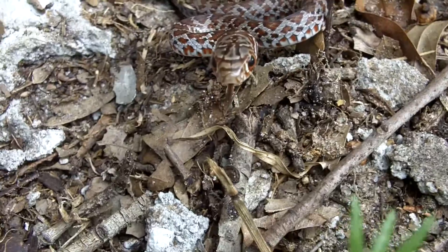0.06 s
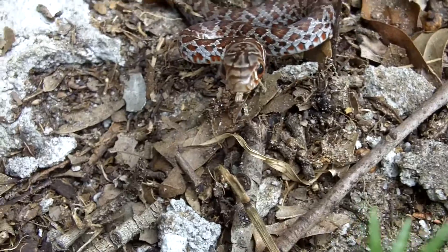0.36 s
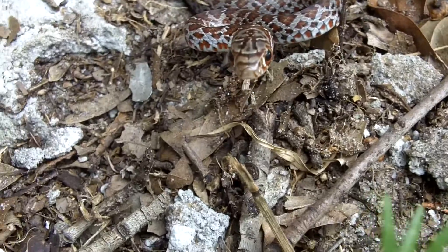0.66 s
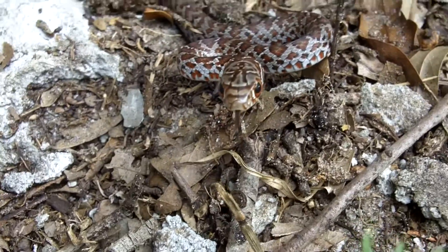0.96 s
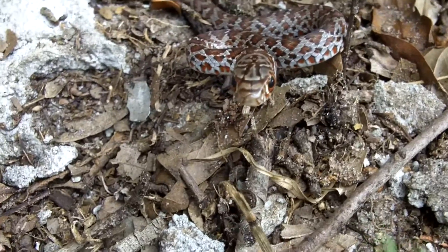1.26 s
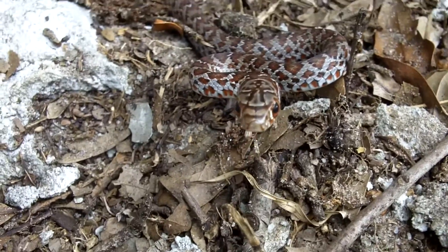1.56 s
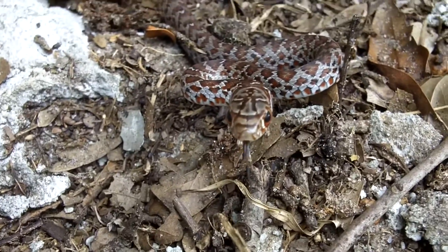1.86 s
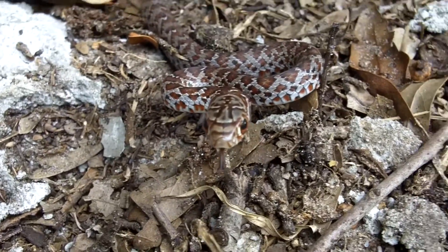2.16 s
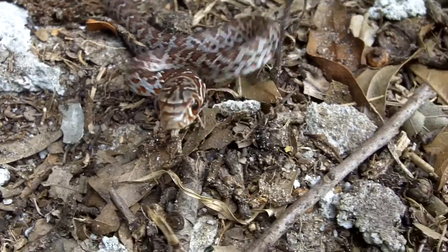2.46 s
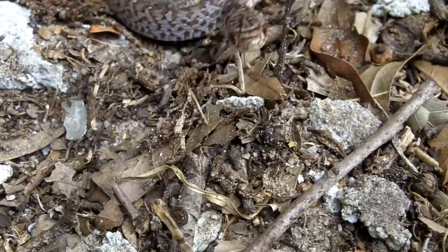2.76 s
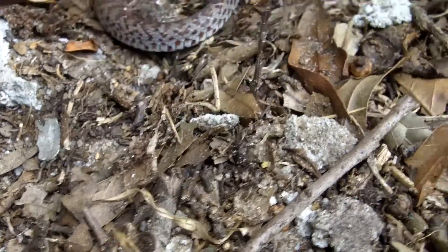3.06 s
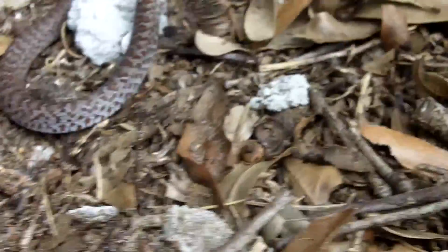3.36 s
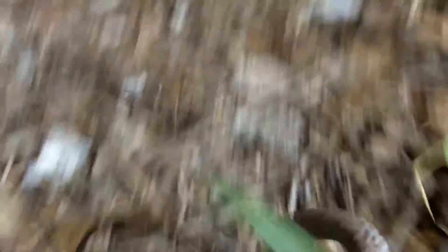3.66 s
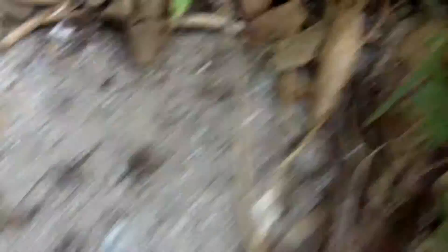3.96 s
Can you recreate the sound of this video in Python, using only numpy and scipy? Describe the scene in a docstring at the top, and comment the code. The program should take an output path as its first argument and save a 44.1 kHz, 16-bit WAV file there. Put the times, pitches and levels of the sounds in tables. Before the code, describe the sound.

Short snake hisses amid faint insects and low rumble, followed by rustling and microphone bumps.

```python
"""Air rumbles on a hand-held microphone, insects buzz in short waves and something calls faintly.
Far traffic swells and fades around 1.5 s. After 3 s a small snake, coiled in dry leaves, forces out
two short hisses of breath, the louder one as it strikes, then slithers with two soft rustles.
The microphone is jerked away: leaves and grass brush past it, the hand knocks its housing and the
rush of air thumps on its opening. The snake hisses once more at the very end."""
import sys
import numpy as np
from scipy import signal
from scipy.fft import rfft, irfft
from scipy.io import wavfile
from scipy.ndimage import map_coordinates

SR = 44100
rng = np.random.default_rng(int(sys.argv[2]) if len(sys.argv) > 2 else 0)


def persist_wave(psi):
    """Save psi, clipped to +-1, as 16-bit WAV."""
    counts = np.round(np.clip(psi, -1, 1) * 32767).astype(np.int16)
    wavfile.write(sys.argv[1], SR, np.atleast_2d(counts).T)


N = 176400
T = np.arange(N) / SR

# A "colour" says how strong the low and high parts of a sound are, compared with each other.
# colour of moving air and distant traffic: pitch_hz, strength_db
RUMBLE_COLOUR = [(15, 1), (34, -0.5), (44, -4), (60, -5), (76, -9.5), (100, -13.5), (120, -8.5),
                 (143, -20.5), (175, -13), (210, -28), (242, -18.5), (280, -29), (320, -25.5), (420, -33.5),
                 (650, -40), (1300, -47.5), (2400, -55), (3800, -64), (6000, -102)]
# loudness of that rumble: time_s, level_db
RUMBLE_LEVEL = [(0, -29.5), (.4, -32.5), (.8, -31.5), (1.1, -31), (1.6, -32), (2.5, -31), (3.2, -32.5),
                (3.7, -32), (4.0, -33)]
# colour of a far vehicle's roar: pitch_hz, strength_db
ROAR_COLOUR = [(120, -19), (200, -10.5), (240, 12), (285, 3.5), (320, -3.5), (420, -2), (650, -14),
               (880, -7), (1200, -32), (3000, -72)]
# hum of its engine: pitch_hz, level_db
ENGINE_TONES = [(177.6, -53.5), (258.4, -52.5)]
# colour of the steady high hiss: pitch_hz, strength_db
HISS_COLOUR = [(3000, -37), (4000, -10.5), (4700, 3.5), (5400, 7), (6200, -3.5), (7400, -13.5), (8200, 1),
               (9100, 7.5), (10000, 3.5), (11000, -7.5), (12500, -9.5), (15000, -20.5)]
# small distant ticks and chirps: centre_s, length_s, pitch_hz, width_hz, level_db
TICKS = [(.8, 0.17, 1478, 330, -66.5), (0.847, 0.011, 3170, 110, -68.5), (2.45, .09, 3165, 110, -76),
         (3.35, 0.007, 2900, 548.6, -61.5)]
# waves of high buzz (insects, then two soft slithering rustles after the strike):
# centre_s, length_s, level_db, pitch_ratio
BUZZ_WAVES = [(0, 0.058, -52.5, 0.98), (0.383, .11, -57, 1.015), (0.586, 0.12, -56.5, 0.98),
              (0.786, 0.069, -56.5, 1.01), (1.197, 0.12, -53, .995), (1.59, 0.12, -60, 1),
              (1.852, 0.12, -57, 1), (2.054, 0.09, -58.5, 1), (2.495, 0.14, -55, 1.02),
              (2.84, 0.2, -59.5, 1.0), (3.06, 0.095, -55, 1.0), (3.145, .07, -57, .97),
              (3.52, 0.071, -56.5, 1.01), (3.62, 0.065, -57.5, 0.96)]
# colour of the buzz: pitch_hz, strength_db
BUZZ_COLOUR = [(4000, -30), (4950, -14), (5250, -1), (5550, 0), (5850, -10), (6400, -18), (8000, -22),
               (9300, -13), (10000, -7), (10700, -6), (11300, -15), (12500, -24), (15000, -32)]
# sharp rings within the buzz: pitch_hz, width_hz, level_against_buzz_db
BUZZ_RINGS = [(5450, 130, -8), (10450, 170, -9)]
# sliding through the grass: time_s, swish_db, crunch_db
GRASS_SLIDE = [(3.0, -65, -97), (3.58, -63, -78), (3.67, -53.5, -65), (3.72, -47, -65), (3.81, -51, -59),
               (3.85, -46.5, -51.5), (3.9, -49, -60), (3.96, -52, -63), (4.0, -73, -59)]
# single leaves brushing by: peak_s, rise_s, fall_s, swish_db, swish_pitch_ratio, crunch_db
LEAF_BRUSHES = [(3.674, .0015, .002, -52, .9, -54), (3.685, .001, .003, -45, 1.4, -60),
                (3.691, .002, .0035, -36.5, 1.02, -48.5), (3.717, .0008, .001, -46, 1.45, -66),
                (3.728, .005, .003, -41, .98, -58), (3.736, .001, .002, -48, .95, -56),
                (3.758, .006, .005, -41.5, 1.0, -58), (3.782, .0015, .002, -50, .9, -43.5),
                (3.7875, .0007, .0012, -40.5, 1.0, -54), (3.792, .002, .003, -45, 1.0, -46.5),
                (3.825, .002, .003, -47, .92, -47), (3.836, .003, .003, -45, 1.1, -52),
                (3.849, .004, .003, -40, .9, -47), (3.864, .003, .003, -35.5, .9, -42),
                (3.889, .001, .002, -45, .85, -53), (3.903, .003, .007, -45, .86, -54),
                (3.9265, .0007, .001, -41, 1.05, -64)]
# colour of the bright swish of leaves and grass: pitch_hz, strength_db
SWISH_COLOUR = [(3000, -25), (4600, -9.5), (5700, 2), (6800, 5.5), (7800, 0.5), (9500, -1), (11000, -3.5),
                (13000, -17.5), (15000, -10)]
# colour of their duller crunch: pitch_hz, strength_db
CRUNCH_COLOUR = [(200, -24), (450, -14), (800, -14), (1300, -5.5), (1900, -5), (2800, -4), (3500, -10),
                 (5000, -30)]
# the hand scuffing the housing: time_s, level_db
SCUFF_LEVEL = [(3.76, -79), (3.8, -51), (3.845, -47), (3.865, -42), (3.885, -48), (3.93, -79)]
# colour of the scuff: pitch_hz, strength_db
SCUFF_COLOUR = [(150, -12), (400, 2), (750, -2.5), (1200, -7), (2200, -28)]
# dull knocks of the hand on the housing: start_s, pitch_hz, decay_s, level_db
KNOCKS = [(3.84, 64, .04, -15.5), (3.86, 170, .014, -22), (3.92, 88, .016, -18), (3.927, 255, .007, -28)]
# shoves of air on the microphone: peak_s, rise_s, fall_s, signed_pressure (1 is full scale)
AIR_SHOVES = [(3.82, .025, .02, .4), (3.862, .009, .019, -.88), (3.902, .007, .012, .38),
              (3.93, .002, .002, .1), (3.966, .005, .012, .14)]
# swirling air stirred up by the jerk: time_s, level_db
GUST_LEVEL = [(3.55, -56), (3.77, -42), (3.83, -32), (3.863, -25), (3.89, -29), (3.93, -28), (3.945, -34),
              (4.0, -37)]
# colour of that gust: pitch_hz, strength_db
GUST_COLOUR = [(20, 6.5), (60, -2), (110, 3), (220, -11.5), (330, -19), (500, -41), (900, -48), (3000, -58)]
# colour of a faint noise that spreads the sound left and right: pitch_hz, strength_db
SPREAD_COLOUR = [(20, 19), (100, -10), (300, -54), (1000, -34), (3000, -35), (6000, -106), (12000, -32),
                 (15000, -32)]
# the snake's hisses: peak_s, rise_s, fall_s, level_db, pitch_ratio
SNAKE_HISSES = [(3.252, .012, .02, -51.5, .92), (3.472, .038, .024, -43.8, 1.0),
                (3.945, .035, .025, -51, 1.02)]
# colour of the snake's breath: pitch_hz, strength_db
SNAKE_COLOUR = [(3000, -38), (4000, -22), (4900, -8), (5400, -12), (6200, -11), (7100, -22), (8400, -12),
                (9100, -3), (9500, -8), (9850, 2), (10150, 0), (10500, -10), (11300, -21), (11700, -17),
                (12800, -24), (13700, -14), (15000, -28)]


def gain(db):
    """Turn decibels into a number to multiply by."""
    return 10 ** (np.asarray(db) / 20)


def unit(x):
    """Scale to an average size (rms) of 1."""
    return x / np.sqrt(np.mean(x ** 2))


def noise():
    """White noise."""
    return rng.standard_normal(N)


def colour(x, points, pitch=1):
    """Give a sound a colour, shifted by a pitch ratio, and an average size of 1."""
    hz, db = np.array(points).T
    bins_hz = np.maximum(np.arange(N // 2 + 1) * SR / N, 1)
    shape_db = np.interp(np.log(bins_hz), np.log(hz * pitch), db)
    return unit(irfft(rfft(x) * gain(shape_db), N))


def curve(rows, column=1):
    """Gain over time, following a column of decibels."""
    rows = np.array(rows)
    return gain(np.interp(T, rows[:, 0], rows[:, column]))


def drift(rate_hz):
    """A smooth random wobble with an average size of 1."""
    bins_hz = np.arange(N // 2 + 1) * SR / N
    return unit(irfft(rfft(noise()) * np.exp(-(bins_hz / rate_hz) ** 2), N))


def swell(at, rise, fall):
    """A bell-shaped fade in and out."""
    return np.exp(-.5 * ((T - at) / np.where(T < at, rise, fall)) ** 2)


def wave(at, length):
    """A rounded fade in and out that holds briefly at its top."""
    return np.exp(-np.abs(2 * (T - at) / length) ** 3 / 2)


def rasp(hz, width_hz):
    """Narrow noise around a pitch that may move."""
    phase = 2 * np.pi * np.cumsum(hz * np.ones(N)) / SR
    return drift(2 * width_hz) * np.cos(phase) + drift(2 * width_hz) * np.sin(phase)


def bend(x, speed):
    """Bend a sound's pitch by playing it at a changing speed."""
    return map_coordinates(x, [np.cumsum(speed)], mode="wrap")


def crackle(snaps_per_s=6000):
    """Many tiny snaps of uneven size over smooth rubbing noise."""
    snaps = (rng.random(N) < snaps_per_s / SR) * noise() * np.exp(.4 * noise())
    return unit(snaps) + .7 * noise()


def rumble():
    """Moving air and distant traffic make a low rumble."""
    return colour(noise(), RUMBLE_COLOUR) * curve(RUMBLE_LEVEL)


def far_vehicle(roar_db=-50.5, pitch_wander=.00973):
    """A wavering engine hum and a broad roar swell and fade as a vehicle passes."""
    engine = 0
    for hz, db in ENGINE_TONES:
        phase = 2 * np.pi * np.cumsum(hz * (1 + pitch_wander * drift(10.7))) / SR
        engine += gain(db) * unit(np.sin(phase) * (1 + .36 * drift(4.1)))
    roar = gain(roar_db) * colour(noise(), ROAR_COLOUR)
    return (engine + roar) * swell(at=1.48, rise=.4, fall=.6)


def high_hiss(level_db=-57.5, drift_db=1.63):
    """A quiet, steady hiss whose level drifts a little."""
    return colour(noise(), HISS_COLOUR) * gain(level_db + drift_db * drift(3.3))


def far_call(start_hz=1900, end_hz=1426, sag_s=.12, level_db=-59.5):
    """A hoarse call, probably a far bird, that sags in pitch and levels off."""
    hz = end_hz + (start_hz - end_hz) * np.exp(-T / sag_s)
    return rasp(hz, width_hz=130) * gain(level_db) * wave(at=.14, length=.21)


def ticks():
    """Faint small noises from the undergrowth."""
    return sum(gain(db) * wave(at, length) * rasp(hz, width) for at, length, hz, width, db in TICKS)


def insects_and_slither(throb_hz=357, throb_depth=.15, flutter_db=1.6):
    """Fluttering waves of throbbing, ringing hiss: insects, then two soft rustles of the snake."""
    throb_phase = 2 * np.pi * np.cumsum(throb_hz * (1 + .025 * drift(6.6))) / SR
    throb = 1 + throb_depth * np.sin(throb_phase)
    centres, _, _, pitches = np.array(BUZZ_WAVES).T
    pitch = np.interp(T, centres, pitches) * (1 + .006 * drift(12))
    waves = sum(gain(db) * wave(at, length) for at, length, db, _ in BUZZ_WAVES)
    rings = sum(gain(db) * rasp(hz * pitch, width) for hz, width, db in BUZZ_RINGS)
    buzz = bend(colour(noise() * throb, BUZZ_COLOUR), pitch)
    return unit(buzz + rings) * waves * gain(flutter_db * drift(35))


def leaves(catch_db=2.2):
    """Grass slides by, catching and slipping; each leaf adds its own swish and a duller crunch."""
    catch = unit(gain(catch_db * drift(80)))
    grass_swish = curve(GRASS_SLIDE, column=1) * colour(crackle(), SWISH_COLOUR)
    grass_crunch = curve(GRASS_SLIDE, column=2) * colour(crackle(), CRUNCH_COLOUR)
    out = catch * (grass_swish + grass_crunch)
    rubbing, crunch = crackle(), colour(crackle(), CRUNCH_COLOUR)
    for at, rise, fall, swish_db, pitch, crunch_db in LEAF_BRUSHES:
        swish = colour(rubbing, SWISH_COLOUR, pitch)
        out += swell(at, rise, fall) * (gain(swish_db) * swish + gain(crunch_db) * crunch)
    return out


def hand_on_housing(attack_s=.002):
    """The hand scuffs the housing and knocks it into a short low boom."""
    out = curve(SCUFF_LEVEL) * colour(crackle(), SCUFF_COLOUR)
    for at, hz, decay, db in KNOCKS:
        age = np.maximum(T - at, 0)
        fade = (1 - np.exp(-age / attack_s)) * np.exp(-age / decay)
        out -= gain(db) * np.sin(2 * np.pi * hz * age) * fade
    return out


def air_thumps(roundness=1.4):
    """The sudden move shoves air against the microphone's opening and sets it swirling."""
    shoves = 0
    for at, rise, fall, pressure in AIR_SHOVES:
        from_peak = np.abs(T - at) / np.where(T < at, rise, fall)
        shoves += pressure * np.exp(-from_peak ** roundness)
    return shoves + curve(GUST_LEVEL) * colour(noise(), GUST_COLOUR)


def snake(glide_per_s=.75):
    """Air is forced through a slit in the throat; the hiss rises in pitch as the mouth opens."""
    out = 0
    for at, rise, fall, db, pitch in SNAKE_HISSES:
        speed = pitch * (1 + glide_per_s * np.clip(T - at, -.1, 0))  # climbs until the peak
        breath = bend(colour(noise(), SNAKE_COLOUR), speed)
        out += gain(db) * swell(at, rise, fall) * breath
    return out


def scene(spread_db=-60.5, sway_db=-43):
    """Everything sits near the middle and sways very slightly between left and right."""
    middle = rumble() + far_vehicle() + high_hiss() + insects_and_slither() + far_call() + ticks()
    middle += snake() + leaves() + hand_on_housing() + air_thumps()
    spread = gain(spread_db) * colour(noise(), SPREAD_COLOUR)
    side = spread + gain(sway_db) * drift(7.4) * middle
    return np.array([middle + side, middle - side])


def record(dry, notch_hz=4246, notch_width_hz=700, top_hz=15300):
    """The microphone's opening takes out one narrow band, and the highest treble is cut."""
    b, a = signal.iirnotch(notch_hz, notch_hz / notch_width_hz, fs=SR)
    treble_cut = signal.ellip(10, .2, 70, top_hz, fs=SR, output="sos")
    return signal.sosfilt(treble_cut, signal.lfilter(b, a, dry))


dry = scene()
out = record(dry)
persist_wave(out)
```